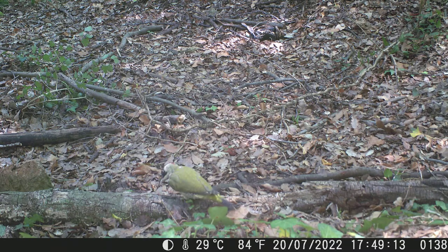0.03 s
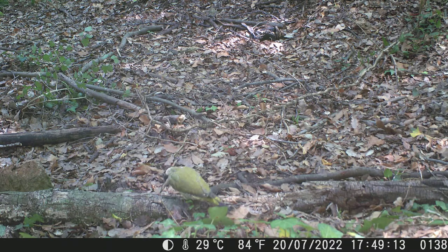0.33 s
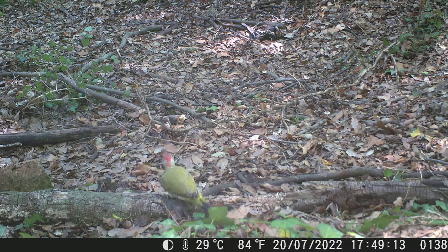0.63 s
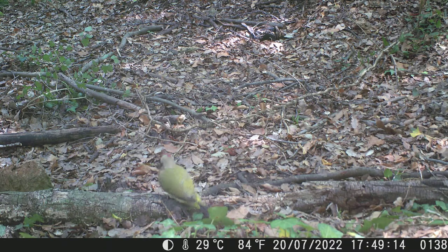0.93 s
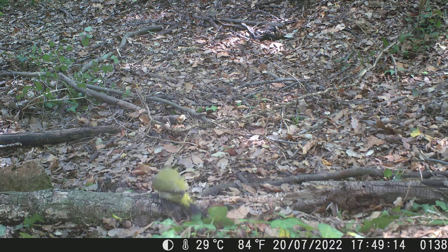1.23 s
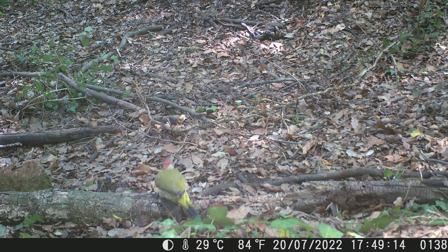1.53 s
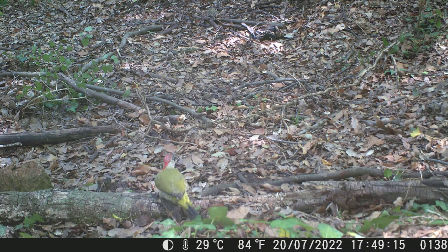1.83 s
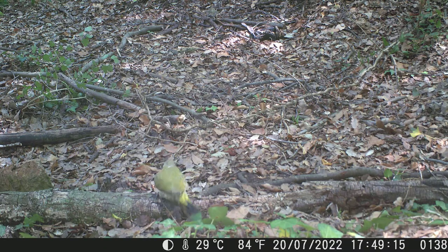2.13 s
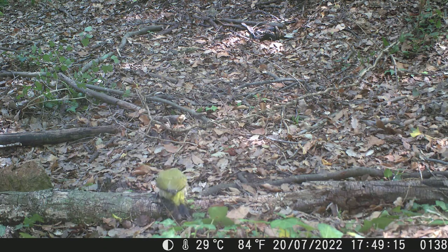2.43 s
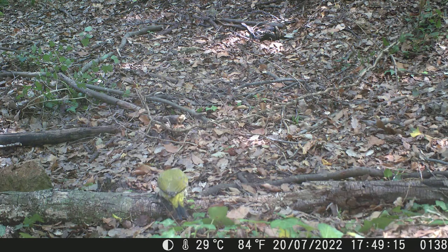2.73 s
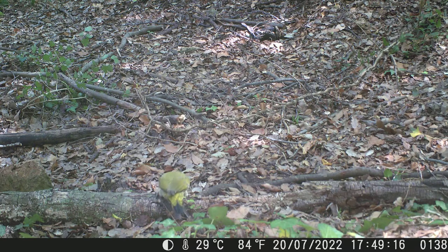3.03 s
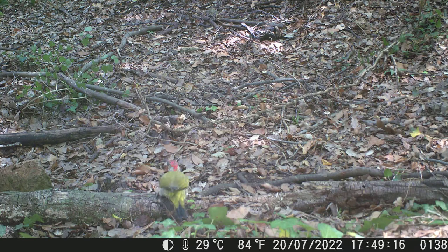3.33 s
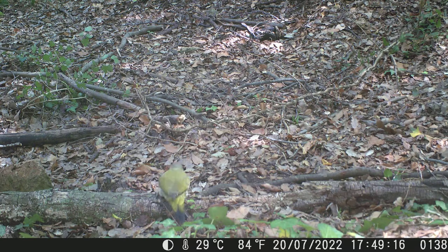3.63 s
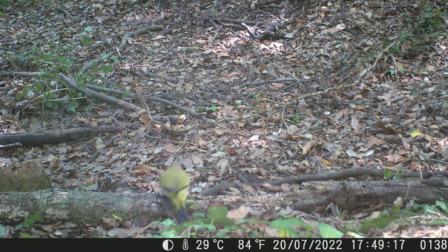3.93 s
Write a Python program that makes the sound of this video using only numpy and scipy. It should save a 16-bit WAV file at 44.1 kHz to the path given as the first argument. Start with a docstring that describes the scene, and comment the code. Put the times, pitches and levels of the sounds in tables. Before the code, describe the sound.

A distant, lumpy engine runs over low forest wind and microphone hiss. From about 1 second it speeds up and grows louder, with exhaust and tyre rush strongest from 3 seconds. Five faint, high bird calls come between 0.4 and 3.2 seconds. Dry leaves crackle near 0.5, 1.4 and 3.7 seconds. A woodpecker knocks on a log at 1.4 seconds, then harder at about 4 seconds.

```python
"""A woodpecker picks at a fallen log on a leafy forest floor, heard through a trail camera's hiss.
At first a distant, lumpy engine runs steadily over low wind; thin, high bird calls begin, and a dry
leaf snaps. Near 1.4 s the beak knocks on the log amid crackling leaves and bark. Meanwhile the
engine speeds up and grows louder, the rush of its exhaust and tyres rising with it. The last call
comes near 3 s; more crackles follow, and a harder knock falls at the very end."""
import sys
import numpy as np
from scipy import signal
from scipy.fft import rfft, irfft
from scipy.io import wavfile

SR = 44100
rng = np.random.default_rng(int(sys.argv[2]) if len(sys.argv) > 2 else 0)


def transcribe(u):
    """Save the signal u as a 16-bit wav file named by the first command-line argument.

    u: samples, shape (n,) or (channels, n), limited to [-1, 1]; the rate is SR.
    q: integer samples, one column per channel.
    """
    v = np.clip(np.atleast_2d(u).T, -1, 1)
    q = np.round(v * 32767).astype(np.int16)
    wavfile.write(sys.argv[1], SR, q)


N = 176400

# Beak strikes. Each row: start in seconds, peak level in dB, spectral tilt in dB per octave.
KNOCKS = [(1.3859, -42.5, -0.8), (3.9807, -35.5, 2.5)]
# Modes of the log. Each row: frequency in Hz, relative level in dB, seconds to decay by 60 dB.
LOG_MODES = [(265, 3.5, 0.032), (414, 2.5, 0.0095), (620, 1, 0.016), (1720, -12.5, 0.0057),
             (2490, -18.5, 0.011)]
# Leaves and bark. Each row: start in seconds, burst level in dB, crack peak over the burst in dB,
# decay time in seconds, band centre in Hz, band width in octaves.
CRACKLES = [(0.4665, -56.5, 10, .0012, 3300, .85), (1.3458, -61.5, 3, 0.0025, 3200, .7),
            (1.3503, -56.5, -4, 0.0035, 7300, 0.25), (1.352, -63, -10, 0.022, 2500, 0.65),
            (1.355, -61, -6, 0.021, 6200, 0.6), (1.379, -66, 0, 0.0017, 5000, 1),
            (1.401, -67, -2, 0.006, 3900, .85), (3.7398, -58, 0, 0.0018, 3600, 0.28),
            (3.961, -67, -3, 0.0031, 4500, 0.6), (3.98, -67, -3, .012, 6500, .6)]
# Engine speed. Each row: time in seconds, firing cycles per second.
CYCLE_RATE = [(0, 19.6), (.5, 19.43), (.95, 19.58), (1.2, 20.08), (1.5, 21.08), (1.8, 21.85), (2.1, 23.02),
              (2.4, 23.87), (2.7, 25.34), (3.0, 27.64), (3.3, 30.1), (3.62, 32.65), (4.0, 35.2)]
# The strong engine harmonics. Each row: time in seconds, levels of harmonics 3, 5 and 8 in dB.
STRONG_LEVELS = [(0.0, -59, -63, -76.5), (0.85, -66.5, -64.5, -69), (1.5, -62, -56, -75.5),
                 (1.68, -66, -70, -80), (1.95, -62, -54.5, -88), (2.25, -68, -60, -70),
                 (2.55, -52, -49.5, -83), (2.85, -54, -55.5, -64), (3.02, -46.5, -45, -65),
                 (3.25, -54.5, -58, -63.5), (3.45, -54, -48.5, -61.5), (3.65, -48, -64, -50.5),
                 (3.8, -46.5, -53, -62.5), (4.0, -45, -53.5, -49.5)]
# Swell shared by the weak harmonics. Each row: time in seconds, base level in dB.
WEAK_SWELL = [(0.0, -80), (1.0, -82), (1.3, -73), (2.25, -74), (2.6, -70), (3.1, -67), (3.5, -65.5),
              (4.0, -71)]
# Weak harmonics of the uneven firing. Each row: multiple of the cycle rate, relative level in dB.
WEAK_HARMONICS = [(1, 4.5), (2, 2.5), (6, 7), (7, 3), (9, 2), (10, 5), (11, 2.5), (13, 1), (14, -1),
                  (16, 2), (17, -3), (18, -7), (19, -4), (22, -10)]
# Response of the exhaust and the path through the trees. Each row: frequency in Hz, gain in dB.
EXHAUST_PATH = [(20, 2), (40, 7), (53, 12), (70, -2.7), (125, 4.5), (150, 1), (190, -11.5), (250, -1.5),
                (295, 2), (330, -3.5), (380, 5.5), (430, -1.5), (520, -5), (700, -8)]
# Swell of the gas and tyre noise. Each row: time in seconds, level in dB.
RUSH_LEVEL = [(0, -76.5), (1.0, -75), (1.4, -73), (2.25, -69), (2.65, -65.5), (3.05, -57.3), (3.4, -56.5),
              (3.8, -58), (4, -57.5)]
# Spectrum of that noise. Each row: frequency in Hz, relative density in dB.
RUSH_SPECTRUM = [(30, -4), (100, -4.5), (190, -7.5), (300, -0.5), (530, -2), (780, -11.5), (1020, -11),
                 (1300, -16.5), (1900, -15.5), (2800, -22), (3800, -26.5), (5000, -43), (8000, -51.5)]
# Bird calls. Each row: start in seconds, level in dB, starting pitch in Hz, hold in seconds.
BIRD_CALLS = [(.37, -76.5, 7200, 0.073), (1.06, -75, 7150, 0.09), (1.38, -75.5, 7280, .08),
              (2.14, -74, 7140, 0.11), (3.06, -77.5, 7320, 0.075)]
# Spectrum of the wind. Each row: frequency in Hz, relative density in dB.
WIND_SPECTRUM = [(10, -11), (24, 0.5), (45, 1.5), (70, -6.5), (100, -3.5), (150, -6.5), (200, -12),
                 (310, -17.5), (385, -12), (470, -24), (700, -25.5), (1500, -49)]
# Spectrum of the camera's hiss. Each row: frequency in Hz, relative density in dB.
HISS_SPECTRUM = [(100, 1.5), (600, 0), (900, 2.5), (1800, 0.5), (2600, -3.5), (3600, -7.5), (4800, -11.5),
                 (6000, -10.5), (7100, -5.5), (8200, -11)]
# The camera's notches. Each row: centre in Hz, half-width in Hz, depth from 0 to 1.
NOTCHES = [(3205, 108, 0.88), (6384, 170, 0.75)]
# The camera's treble roll-off. Each row: frequency in Hz, gain in dB.
ROLL_OFF = [(7500, 0), (8200, -3.5), (8600, -15), (9000, -23.5)]

TIME = np.arange(N) / SR
FREQS = np.maximum(np.arange(N // 2 + 1) * SR / N, 1)


def undb(db):
    return 10 ** (np.asarray(db) / 20)


def curve(rows):
    """Linear interpolation in time through rows of seconds and value."""
    return np.interp(TIME, *np.array(rows, float).T)


def response(rows, hz=FREQS):
    """Amplitude gain at hz, interpolated in log frequency through rows of Hz and dB."""
    points_hz, db = np.array(rows, float).T
    return undb(np.interp(np.log(hz), np.log(points_hz), db))


def noise(gain):
    """White noise filtered by a gain per frequency and scaled to an rms of 1."""
    shaped = irfft(rfft(rng.standard_normal(N)) * gain, N)
    return shaped / np.sqrt(np.mean(shaped ** 2))


def drift(rate):
    """Low-pass noise of rms 1 that changes about rate times a second."""
    return noise(1 / (1 + (FREQS / rate * 2) ** 4))


def beak_knocks(contact_s=0.00028):
    """An impact excites the soft log's heavily damped modes; neighbouring modes have opposite signs."""
    out = np.zeros(N)
    for start, db, tilt_db in KNOCKS:
        age = np.maximum(TIME - start, 0)
        ring = np.zeros(N)
        for k, (hz, mode_db, t60) in enumerate(LOG_MODES):
            amplitude = (-1) ** k * undb(mode_db + tilt_db * np.log2(hz))
            ring += amplitude * np.sin(2 * np.pi * hz * age) * undb(-60 * age / t60)
        ring *= 1 - np.exp(-age / contact_s)
        out += undb(db) * ring / np.abs(ring).max()
    return out


def leaf_crackles(attack_s=0.00086, grain_db=2.5, port_hz=7370, port_half_width_hz=360, port_db=8):
    """Dry leaves and bark emit an impulse and grainy noise, brightened by microphone port resonance."""
    out = np.zeros(N)
    port = 1 + undb(port_db) / (1 + ((FREQS - port_hz) / port_half_width_hz) ** 2)
    for start, db, crack_db, decay_s, hz, octaves in CRACKLES:
        age = np.maximum(TIME - start, 0)
        band = port * np.exp(-.5 * (np.log2(FREQS / hz) / octaves) ** 2)
        crack = irfft(band * np.exp(-2j * np.pi * FREQS * (start + attack_s)), N)  # delayed impulse
        envelope = np.minimum(age / attack_s, 1) * np.exp(-np.maximum(age - attack_s, 0) / decay_s)
        burst = noise(band) * envelope * undb(grain_db * drift(800))
        out += undb(db) * (undb(crack_db) * crack / np.abs(crack).max() + burst)
    return out


def engine_harmonic(order, cycles, scatter=0.35, reference_hz=293, scatter_rate=9.6):
    """Forest scattering adds to a direct tone a random part that grows with frequency; rms is near 1."""
    spread = scatter * np.sqrt(order * curve(CYCLE_RATE) / reference_hz)
    scattered = spread * (drift(scatter_rate) + 1j * drift(scatter_rate))
    amplitude = (1 + scattered) / np.sqrt(.5 + spread ** 2)
    return np.real(amplitude * np.exp(2j * np.pi * (order * cycles + rng.random())))


def engine(cycles, weak_gain_db=1, fade_db=2.04, fade_rate=4):
    """Periodic, uneven firing radiates harmonics of the cycle rate: three strong and many weak."""
    out = np.zeros(N)
    when, *levels = np.array(STRONG_LEVELS, float).T
    for order, db in zip((3, 5, 8), levels):
        out += engine_harmonic(order, cycles) * undb(np.interp(TIME, when, db))
    swell_db = curve(WEAK_SWELL) + weak_gain_db
    for order, db in WEAK_HARMONICS:
        tone = engine_harmonic(order, cycles) * response(EXHAUST_PATH, order * curve(CYCLE_RATE))
        out += tone * undb(swell_db + db + fade_db * drift(fade_rate))  # each fades on its own
    return out


def vehicle_rush(cycles, throb_depth=0.08, flicker_db=1.38):
    """Exhaust gas and tyres make broadband noise, amplitude-modulated by the engine cycle."""
    throb = 1 + throb_depth * np.cos(2 * np.pi * cycles)
    return noise(response(RUSH_SPECTRUM)) * throb * undb(curve(RUSH_LEVEL) + flicker_db * drift(24))


def far_birds(attack_s=0.04, decay_s=0.055, fall_hz_per_s=1300, haze_hz=230):
    """Scattering by trees broadens each falling whistle and its airy opening into narrow-band noise."""
    opening_hz, opening_db, opening_s = 7880, -3, 0.12
    out = np.zeros(N)
    for start, db, hz, hold_s in BIRD_CALLS:
        age = np.maximum(TIME - start, 0)
        release = np.exp(-np.maximum(age - attack_s - hold_s, 0) / decay_s)
        pitch = hz - fall_hz_per_s * np.minimum(age, attack_s + hold_s)
        whistle = np.minimum(age / attack_s, 1) * release * np.sin(2 * np.pi * np.cumsum(pitch) / SR)
        arch = np.sin(np.pi * np.minimum(age / opening_s, 1))
        opening = undb(opening_db) * arch * np.sin(2 * np.pi * opening_hz * age)
        haze = noise(1 / (1 + (FREQS / haze_hz) ** 2))
        out += undb(db) * haze * (opening + whistle)
    return out


def wind(level_db=-59, gust_db=1):
    """Wind rumbles as low-frequency noise, its amplitude slowly modulated by gentle gusts."""
    return noise(response(WIND_SPECTRUM)) * undb(level_db + gust_db * drift(2.3))


def scene():
    """The sources superpose in one channel; engine and rush share a phase, the integral of cycle rate."""
    cycles = np.cumsum(curve(CYCLE_RATE)) / SR
    vehicle = engine(cycles) + vehicle_rush(cycles)
    return (beak_knocks() + leaf_crackles() + vehicle + far_birds() + wind())[None]


def record(dry, hiss_db=-69, cutoff_hz=8900):
    """The camera adds self-noise; its frequency response notches two narrow bands and cuts the top."""
    hissy = dry + undb(hiss_db) * noise(response(HISS_SPECTRUM))
    gain = response(ROLL_OFF)
    for hz, half_width, depth in NOTCHES:
        gain *= 1 - depth / (1 + ((FREQS - hz) / half_width) ** 2)
    low_pass = signal.ellip(8, .2, 70, cutoff_hz, fs=SR, output="sos")
    return signal.sosfilt(low_pass, irfft(rfft(hissy) * gain, N))


dry = scene()
out = record(dry)
transcribe(out)
```